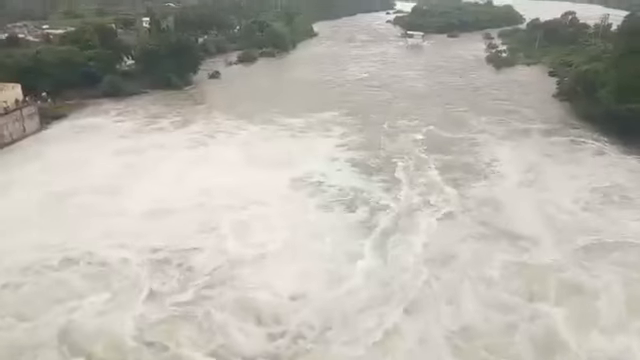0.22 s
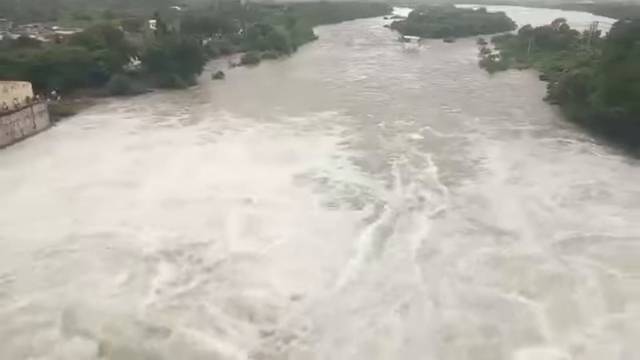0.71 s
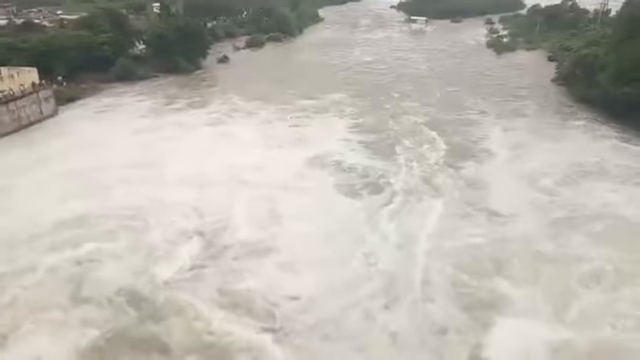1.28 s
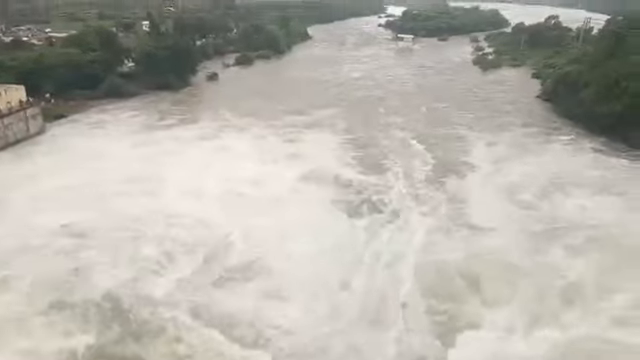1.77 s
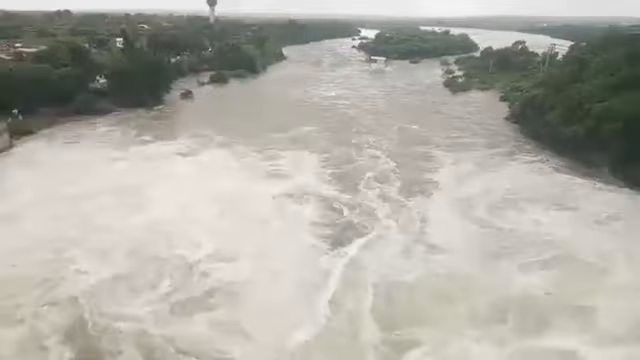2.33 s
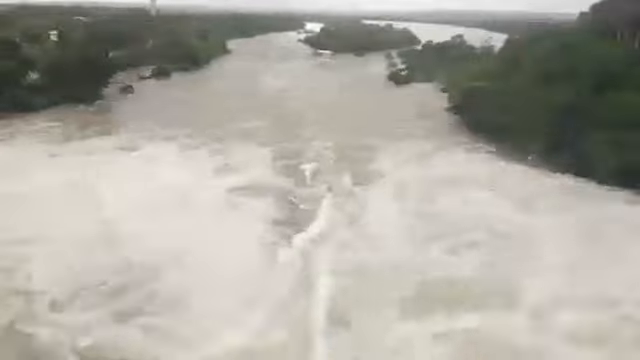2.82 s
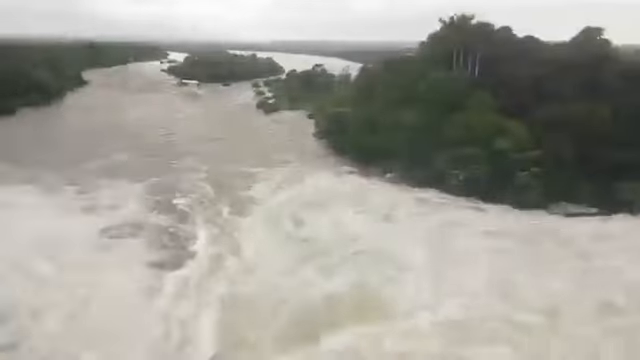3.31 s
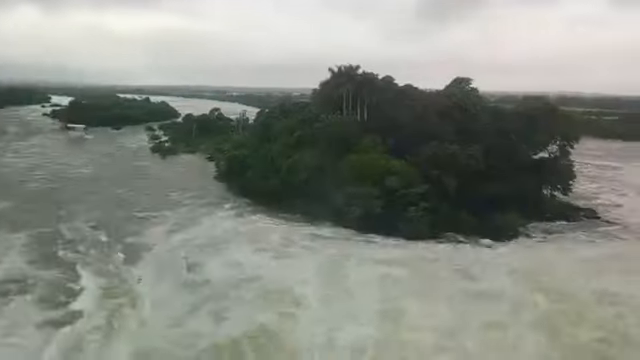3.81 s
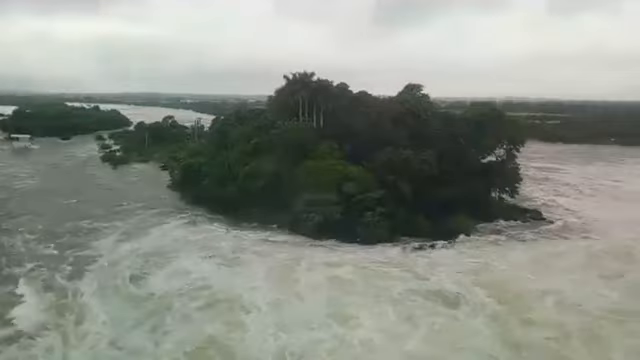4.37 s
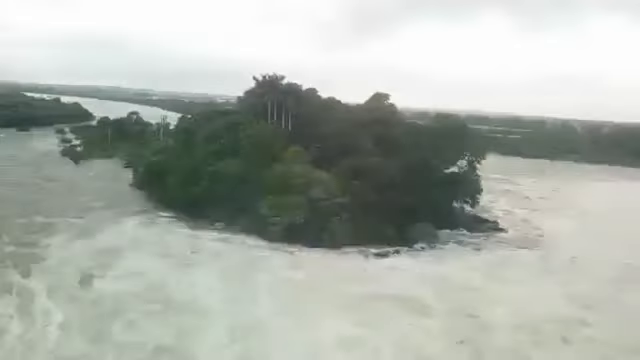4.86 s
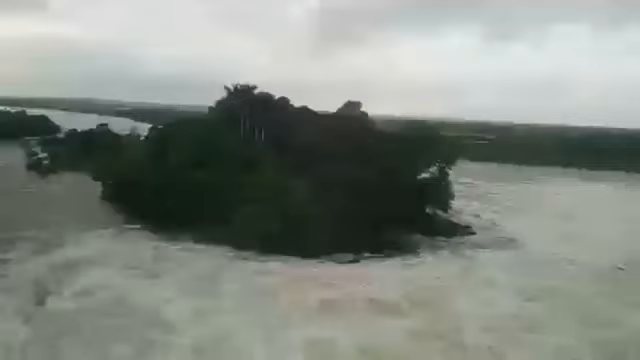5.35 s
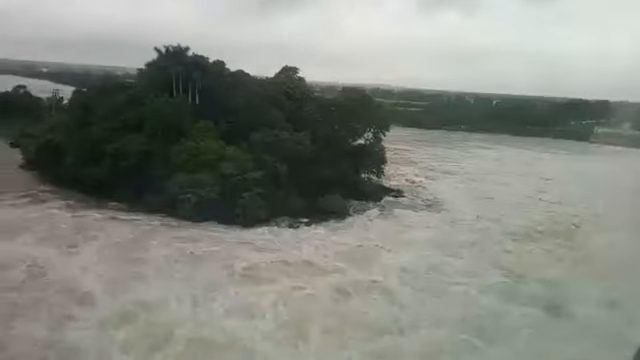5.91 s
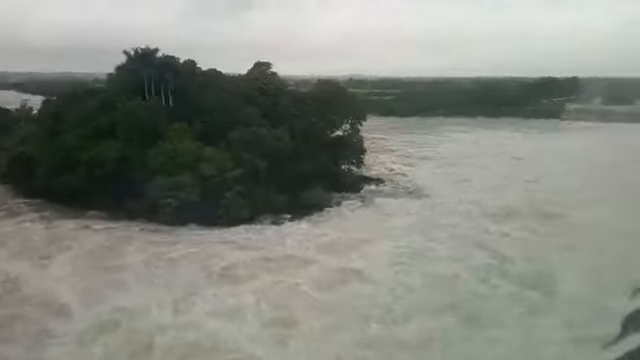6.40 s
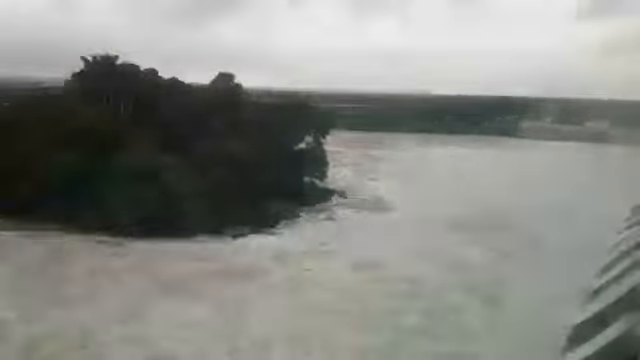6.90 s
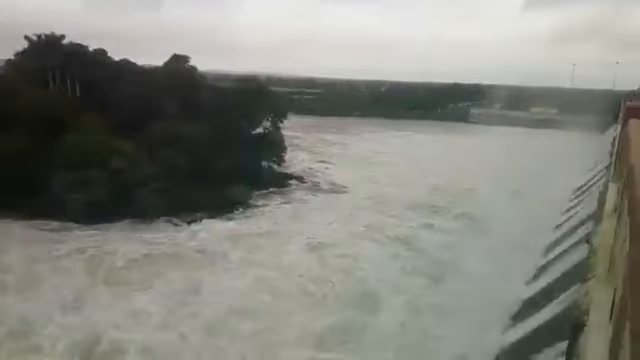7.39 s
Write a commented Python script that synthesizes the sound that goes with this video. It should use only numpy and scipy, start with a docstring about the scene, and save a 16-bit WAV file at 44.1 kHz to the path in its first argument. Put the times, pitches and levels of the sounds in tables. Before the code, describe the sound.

Floodwater leaves the open gates of a dam and boils in the river below, heard outdoors from high on the crest. From the very start there is a loud, steady rush: a dull low roar, churning waves in the middle, and splashing crests, hissing spray and fizzing foam on top. Everything merges into one dense wash, with only small, irregular swells and a fine flutter in the hiss. At about 3.9 seconds the listener turns toward the plunge pool, so the deep rumble grows while the churning eases slightly. The heavier low end stays, heaving gently. From about 6.5 seconds, as the listener swings toward the gates, the wash of the rapids and the airy hiss rise a little. The water keeps roaring without a break until the end, at about 7.7 seconds.

```python
"""Floodwater leaves a dam's open gates and boils in the river below, heard from high on the crest.
From the start, countless bubbles merge into a steady rush: waves churn, crests splash, spray hisses,
foam fizzes. Near 3.9 s the listener turns to the plunge pool and its rumble grows. From 6.5 s the gates
swing into view; the wash of the rapids and the airy hiss rise a little."""
import sys
import numpy as np
from scipy import signal
from scipy.fft import rfft, irfft, next_fast_len
from scipy.io import wavfile
from scipy.ndimage import uniform_filter1d, minimum_filter1d

SR = 44100
rng = np.random.default_rng(int(sys.argv[2]) if len(sys.argv) > 2 else 0)


def int16_out(signal):
    """Quantize to a 16-bit WAV file."""
    q = np.round(np.clip(np.atleast_2d(signal).T, -1, 1) * 32767)
    wavfile.write(sys.argv[1], SR, q.astype(np.int16))


N = 338247

# low, mid and high water noise: freq_hz, density_db
ROAR_SPECTRUM = [(20, -16.5), (40, -22), (58, -9.5), (85, -3.5), (120, 0.5), (180, 0.2), (270, -1.4),
                 (350, -4.5), (470, -6.5), (700, -9), (850, -10), (1020, -13), (1270, -18), (1500, -16.3),
                 (1900, -15.7)]
RUSH_SPECTRUM = [(1100, -0.5), (1280, -3), (1600, -4.5), (1900, -3.5), (2300, -4.5), (2750, -5.5),
                 (3400, -7), (3850, -4.5), (4400, -3.5), (4950, -6), (5450, -5), (6100, -3.5), (6650, -5.5),
                 (7000, -9.5)]
FIZZ_SPECTRUM = [(6500, 9.5), (7600, 2.5), (9000, -2.5), (11000, -8), (13500, -14.5), (14800, -5.5),
                 (15700, -4.5)]
# listener's heading: time_s, turn_share (0 = downstream, 1 = open to the pool)
LISTENER_TURN = [(0.0, 0.38), (1.0, 0.06), (3.76, 0.4), (3.92, 0.85), (6.4, 1.0), (7.67, 0.6)]
# air clouds well up: start_s, length_s, depths_rise_db, plunge_rise_db, boil_rise_db
UPWELLING_SURGES = [(1.18, 0.11, -3, 2, -0.7), (1.45, 0.2, 1.5, 0.7, 1.5), (2.16, 0.11, 2, 4.5, 1),
                    (3.89, 0.17, 2, 3, 1.5), (4.2, 0.2, -1, -1, 1), (4.59, 0.23, -6.5, 5.6, -0.7),
                    (4.99, 0.11, 4.5, 3, -0.5), (5.45, 0.4, 1.5, -2, 2), (6.29, 0.25, -1.5, 1.5, 1.5),
                    (6.88, 0.25, 1.5, 3, 0.5), (7.2, 0.5, 1, 0, -0.3)]
# large waves fold over: start_s, length_s, churn_rise_db, unused_db
FOLD_SURGES = [(0.1, 0.2, 0.3, 1.2), (1.4, 0.14, 1.5, -0.8), (2.04, 0.13, 1.5, 0.8), (2.88, 0.18, 1.3, 0.8),
               (3.19, 0.088, 2, -2), (3.6, 0.17, 1.3, -1), (4.1, 0.35, 0.5, 1.3), (5.45, 0.2, 1, 2.2),
               (6.04, 0.12, 1, 4), (6.52, 0.3, 1.5, 1.6)]
# crests break into foam: start_s, length_s, splash_rise_db, fizz_rise_db, air_rise_db
BREAKER_SURGES = [(0.0, 0.36, 4.5, 5.4, 3.6), (0.47, 0.21, 2.5, 4.0, 3.6), (1.78, 0.62, 0.5, 3.5, 1),
                  (2.42, 0.31, 2, 4.5, 2.8), (3.97, 0.12, 3.5, 3.2, 5), (4.12, 0.22, 3, 4.2, 6.3),
                  (5.44, 0.062, 3.5, 1.2, 2), (6.09, 0.27, 3, 2.8, 3.2), (6.3, 0.1, 3, 5, 5.4),
                  (6.52, 0.33, 4, 2.5, 5), (6.85, 0.66, 2.5, 1.8, 4.2), (7.27, 0.45, 2.5, 5.5, 4)]
# drifting spray: time_s, level_db
SPRAY_LEVEL = [(0.0, -38.5), (0.28, -35), (1.15, -39.5), (1.65, -38.5), (2.6, -34.5), (3.1, -33.5),
               (3.5, -32.5), (3.98, -35.8), (5.2, -36.4), (5.5, -33.5), (5.95, -34.5), (6.22, -37),
               (7.0, -35), (7.42, -31)]
# notch in the rush: time_s, removed_share
HOLLOW_DEPTH = [(0.0, 0.22), (1.0, 0.03), (4.5, 0.028), (5.85, 0.33), (6.2, 0.05), (6.75, 0.018),
                (7.25, 0.36)]

# band edges between the sources
DEPTHS_TOP_HZ, PLUNGE_TOP_HZ, BOIL_TOP_HZ, ROLLER_TOP_HZ = 103, 168, 336.5, 542
CHURN_TOP_HZ, RAPIDS_TOP_HZ, SPLASH_TOP_HZ = 1196, 1816, 3550
SHEET_TOP_HZ, SPRAY_TOP_HZ, FOAM_TOP_HZ, CUTOFF_HZ = 4760, 6970, 11100, 15750
# base level facing downstream, change at full turn
BOIL_DB, BOIL_TURN_DB = -24, 1.2
CHURN_DB, CHURN_TURN_DB = -24.5, -4
ROLLER_DB = -27
PLUNGE_DB, PLUNGE_TURN_DB = -30, 4.6
DEPTHS_DB, DEPTHS_TURN_DB = -32.5, 5.5
SPLASH_DB, SPLASH_TURN_DB = -29.5, -1
RAPIDS_DB, RAPIDS_TURN_DB = -29.5, -2
SHEET_DB, SHEET_TURN_DB = -33, -0.1
FIZZ_DB, FIZZ_TURN_DB = -52, -0.1
AIR_DB, AIR_TURN_DB = -62, 5.5

SHEET_FOLLOWS_SPLASH, SHEET_FOLLOWS_SPRAY, AIR_FOLLOWS_SPRAY = 0.12, 0.22, 0.3   # dB per dB
SURGE_ATTACK_S, SURGE_RELEASE_S, SURGE_SAG_PER_S = 0.078, 0.17, 0.13
GATES_START_S, GATES_SWING_S, RAPIDS_GATES_DB, AIR_GATES_DB = 6.5, 0.79, 1.5, 0.5
FLICKER_DB, FLICKER_HZ = 0.66, 16   # all the treble together
HOLLOW_HZ, HOLLOW_WIDTH_HZ = 3480, 1400


def boil():
    """Clouds of air well up and break apart with a dull roar."""
    return colour(rng.standard_normal(N), ROAR_SPECTRUM, PLUNGE_TOP_HZ, BOIL_TOP_HZ, order=6)


def churning_waves():
    """Waves fold over and trap large, gurgling air pockets."""
    pockets = bubbles(548.5, 1167, per_s=5000, ring_cycles=25, spread_db=1, sizes=12)
    water = turbulence(swing_db=1, rate_hz=7.7) + from_db(-6.5) * pockets
    return colour(water, ROAR_SPECTRUM, ROLLER_TOP_HZ, CHURN_TOP_HZ, order=8)


def rollers():
    """Standing waves roll back on themselves below the pool."""
    water = turbulence(swing_db=0.4, rate_hz=2.3)
    return colour(water, ROAR_SPECTRUM, BOIL_TOP_HZ, ROLLER_TOP_HZ, order=6)


def plunge_pool():
    """Jets drive big air clouds under water; each throbs as a whole."""
    throb = turbulence(swing_db=0.5, rate_hz=2.7)
    return colour(throb, ROAR_SPECTRUM, DEPTHS_TOP_HZ, PLUNGE_TOP_HZ, order=6)


def pool_depths():
    """The largest, deepest clouds heave with a low thunder."""
    heave = turbulence(swing_db=0.9, rate_hz=1.9)
    return colour(heave, ROAR_SPECTRUM, 12, DEPTHS_TOP_HZ, order=6)


def splashing_crests():
    """Breaking crests throw drops back on the river, making small bubbles."""
    drops = bubbles(1732, 3395, per_s=8000, ring_cycles=34, spread_db=2, sizes=14)
    water = turbulence(swing_db=1.04, rate_hz=16) + from_db(-11) * drops
    return colour(water, RUSH_SPECTRUM, RAPIDS_TOP_HZ, SPLASH_TOP_HZ, order=9)


def far_rapids():
    """Rapids downstream merge into an even wash."""
    water = turbulence(swing_db=0.5, rate_hz=14)
    return colour(water, RUSH_SPECTRUM, CHURN_TOP_HZ, RAPIDS_TOP_HZ, order=9)


def spillway_sheets():
    """Fast water sheets tear along the concrete with an even hiss."""
    flow = turbulence(swing_db=0.4, rate_hz=16)
    return colour(flow, RUSH_SPECTRUM, SPLASH_TOP_HZ, SHEET_TOP_HZ, order=10)


def spray():
    """Fine spray hisses up to a steep band edge."""
    mist = turbulence(swing_db=0.87, rate_hz=15)
    hiss = colour(mist, RUSH_SPECTRUM, SHEET_TOP_HZ, CUTOFF_HZ, order=10)
    lowpass = signal.ellip(8, 0.3, 50, SPRAY_TOP_HZ, fs=SR, output="sos")
    return unit_rms(signal.sosfilt(lowpass, hiss))


def foam(fizz_db, air_db):
    """The tiniest bubbles burst, dulled by distance; an airy hiss lies above them."""
    bursts = turbulence(swing_db=0.45, rate_hz=20)
    fizz = colour(bursts, FIZZ_SPECTRUM, SPRAY_TOP_HZ, FOAM_TOP_HZ, order=12)
    shimmer = turbulence(swing_db=0.6, rate_hz=15)
    air = colour(shimmer, FIZZ_SPECTRUM, FOAM_TOP_HZ, 17500, order=12)
    return from_db(fizz_db) * fizz + from_db(air_db) * air


def turbulence(swing_db, rate_hz):
    """Merged bubble collapses: white noise that swells and sinks with the eddies."""
    return rng.standard_normal(N) * from_db(swing_db * drift(rate_hz))


def bubbles(low_hz, high_hz, per_s, ring_cycles, spread_db, sizes):
    """Bubbles pinch off at random and ring down 60 dB in ring_cycles; rms 1."""
    out = np.zeros(N)
    for hz in np.geomspace(low_hz, high_hz, sizes):
        born = rng.random(N) < per_s / sizes / SR
        kicks = rng.standard_normal(N) * born
        kicks[born] *= from_db(spread_db * np.minimum(np.abs(kicks[born]), 2))
        decay = from_db(-60 * hz / (ring_cycles * SR))
        feedback = [1, -2 * decay * np.cos(2 * np.pi * hz / SR), decay * decay]
        ringing = signal.lfilter([1, 0, -1], feedback, kicks + 1e-18)
        out += np.sqrt(hz) * unit_rms(ringing)
    return unit_rms(out)


def surges(rows):
    """Each surge rises, sags and dies, displacing the last; one dB curve per rise column."""
    time_s = np.arange(N) / SR
    curves_db = 0
    for start_s, length_s, *rise_db in rows:
        age_s = time_s - start_s
        release = 1 - (age_s - length_s) / SURGE_RELEASE_S
        shape = np.clip(np.minimum(age_s / SURGE_ATTACK_S, release), 0, 1)
        sag = 1 - SURGE_SAG_PER_S * age_s
        curves_db = curves_db * (1 - shape) + np.outer(rise_db, shape * sag)
    return curves_db


def parapet_reflection(x, share, delay_s):
    """Direct sound plus a near reflection, which combs the midrange."""
    n = np.arange(N)
    return x + share * np.interp(n - delay_s * SR, n, x, left=0)


def hollow(x, depth):
    """A shallow notch parts the hiss from the roar."""
    band = signal.lfilter(*signal.iirpeak(HOLLOW_HZ, HOLLOW_HZ / HOLLOW_WIDTH_HZ, fs=SR), x)
    return x - depth * band


def limiter(x, ceiling_db, hold_s):
    """Gain dips smoothly around peaks above the ceiling."""
    span = int(hold_s * SR)
    allowed = np.minimum(1, from_db(ceiling_db) / (np.abs(x) + 1e-9))
    return x * uniform_filter1d(minimum_filter1d(allowed, span), span)


def colour(x, spectrum, low_hz, high_hz, order):
    """Apply a spectrum between two Butterworth edges; rms 1."""
    size = next_fast_len(N)
    hz = np.maximum(np.arange(size // 2 + 1) * SR / size, 1)
    point_hz, point_db = np.transpose(spectrum)
    shape = from_db(np.interp(np.log(hz), np.log(point_hz), point_db))
    edges = np.sqrt((1 + (low_hz / hz) ** (2 * order)) * (1 + (hz / high_hz) ** (2 * order)))
    return unit_rms(irfft(rfft(x, size) * shape / edges, size)[:N])


def drift(rate_hz):
    """Random wander, mostly below rate_hz; rms 1."""
    hz = np.arange(N // 2 + 1) * SR / N
    return unit_rms(irfft(rfft(rng.standard_normal(N)) / (1 + (hz / rate_hz) ** 2), N))


def per_sample(rows):
    """Interpolate (time_s, value) rows."""
    return np.interp(np.arange(N) / SR, *np.transpose(rows))


def from_db(db):
    """Decibels to gain."""
    return 10 ** (np.asarray(db) / 20)


def unit_rms(x):
    """Scale to rms 1."""
    return x / np.sqrt(np.mean(x ** 2) + 1e-20)


def scene():
    """Open-air mono mix; the turn and the surges set the balance."""
    turn = per_sample(LISTENER_TURN)
    gates = np.clip((np.arange(N) / SR - GATES_START_S) / GATES_SWING_S, 0, 1)
    spray_db = per_sample(SPRAY_LEVEL)
    spray_swing_db = spray_db - spray_db.mean()
    depths_rise_db, plunge_rise_db, boil_rise_db = surges(UPWELLING_SURGES)
    splash_rise_db, fizz_rise_db, air_rise_db = surges(BREAKER_SURGES)
    churn_rise_db = surges(FOLD_SURGES)[0]

    boil_db = BOIL_DB + BOIL_TURN_DB * turn + boil_rise_db
    churn_db = CHURN_DB + CHURN_TURN_DB * turn + churn_rise_db
    plunge_db = PLUNGE_DB + PLUNGE_TURN_DB * turn + plunge_rise_db
    depths_db = DEPTHS_DB + DEPTHS_TURN_DB * turn + depths_rise_db
    splash_db = SPLASH_DB + SPLASH_TURN_DB * turn + splash_rise_db
    rapids_db = RAPIDS_DB + RAPIDS_TURN_DB * turn + RAPIDS_GATES_DB * gates
    sheet_db = SHEET_DB + SHEET_TURN_DB * turn
    sheet_db += SHEET_FOLLOWS_SPLASH * splash_rise_db + SHEET_FOLLOWS_SPRAY * spray_swing_db
    fizz_db = FIZZ_DB + FIZZ_TURN_DB * turn + fizz_rise_db
    air_db = AIR_DB + AIR_TURN_DB * turn + air_rise_db
    air_db += AIR_GATES_DB * gates + AIR_FOLLOWS_SPRAY * spray_swing_db
    flicker = from_db(FLICKER_DB * drift(FLICKER_HZ))

    rumble = from_db(depths_db) * pool_depths() + from_db(plunge_db) * plunge_pool()
    roar = from_db(boil_db) * boil() + from_db(ROLLER_DB) * rollers()
    wash = from_db(rapids_db) * far_rapids() + from_db(splash_db) * splashing_crests()
    river = from_db(churn_db) * churning_waves() + flicker * wash
    river = parapet_reflection(river, share=0.08 * (1 - turn), delay_s=0.00106)
    hiss = from_db(sheet_db) * spillway_sheets() + from_db(spray_db) * spray() + foam(fizz_db, air_db)
    rush = hollow(river + flicker * hiss, per_sample(HOLLOW_DEPTH))
    return (rumble + roar + rush)[None]


def record(dry):
    """Peak limiter, then a steep lowpass."""
    held = limiter(dry, ceiling_db=-6, hold_s=0.0044)
    lowpass = signal.ellip(12, 0.1, 80, CUTOFF_HZ, fs=SR, output="sos")
    return signal.sosfilt(lowpass, held)


dry = scene()
out = record(dry)
int16_out(out)
```